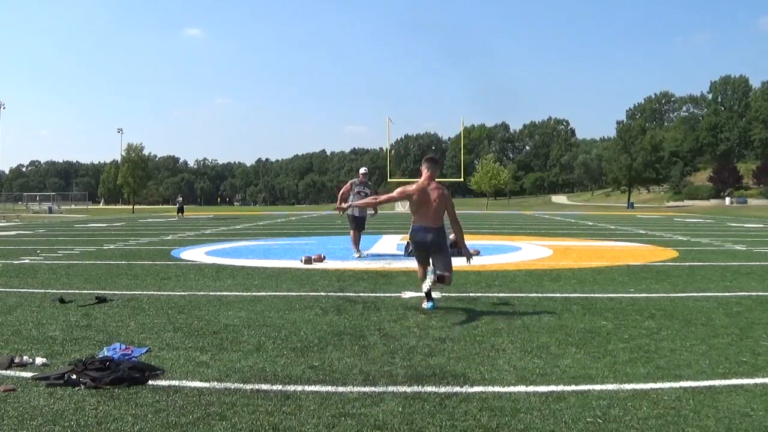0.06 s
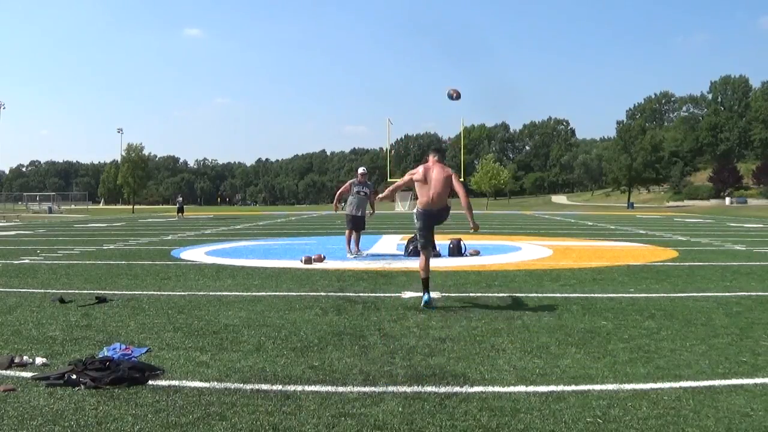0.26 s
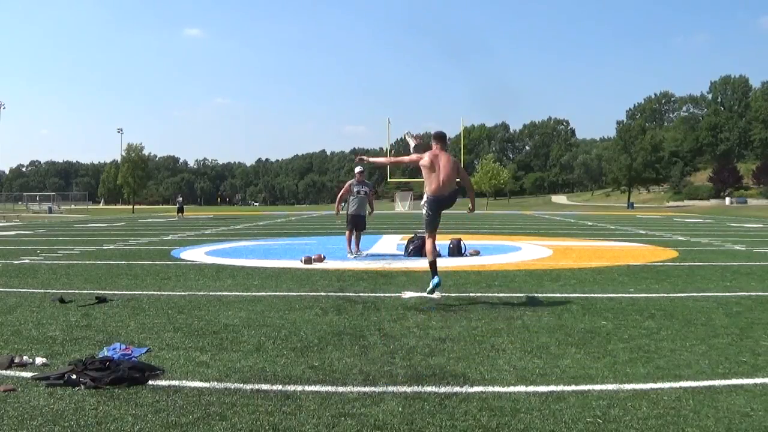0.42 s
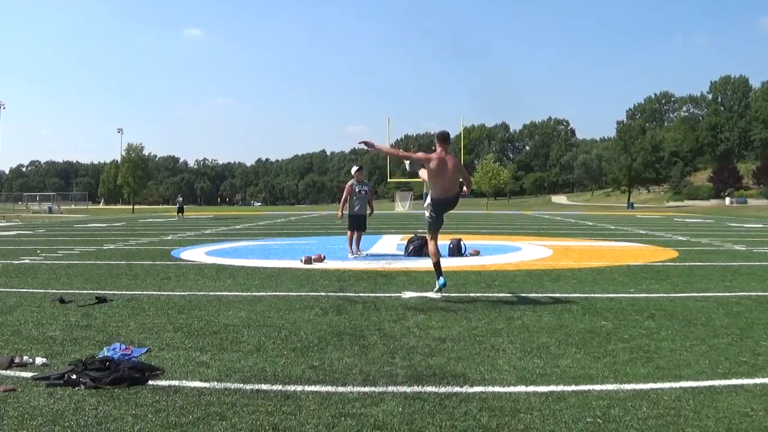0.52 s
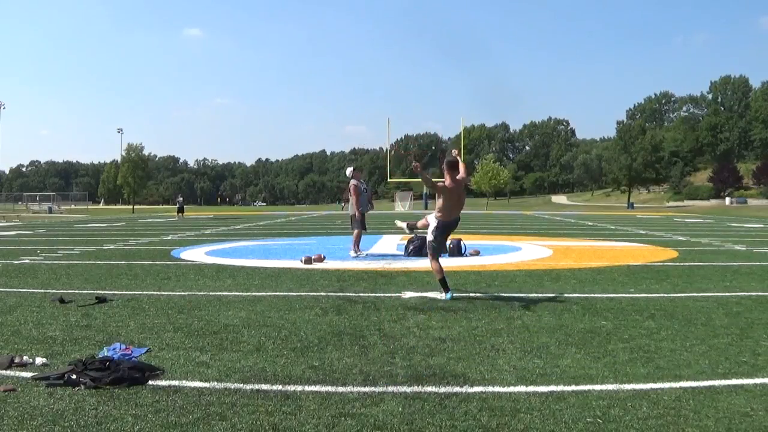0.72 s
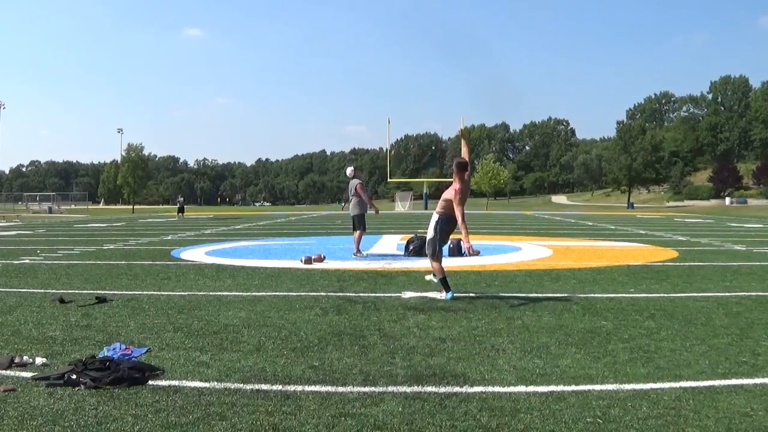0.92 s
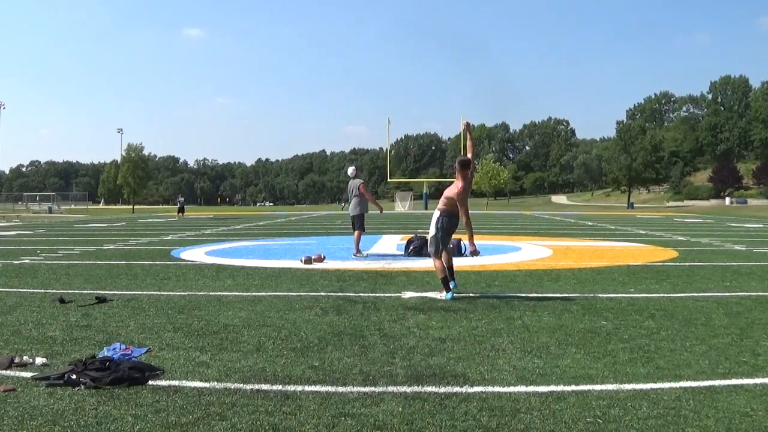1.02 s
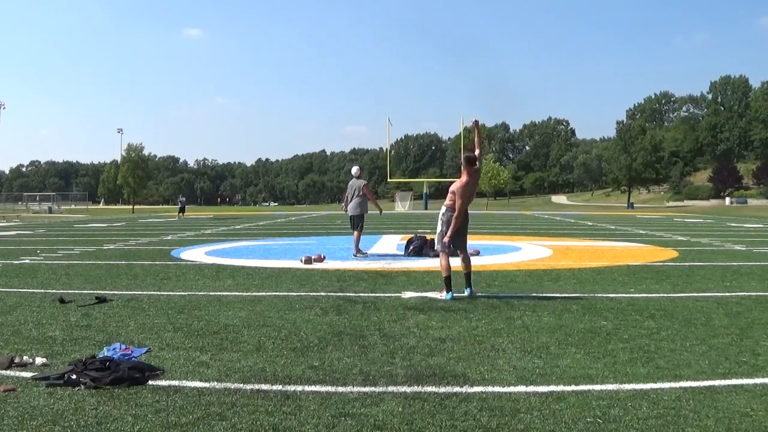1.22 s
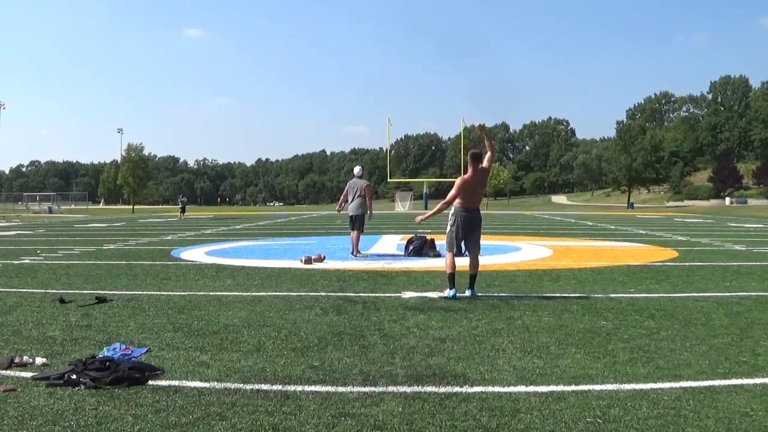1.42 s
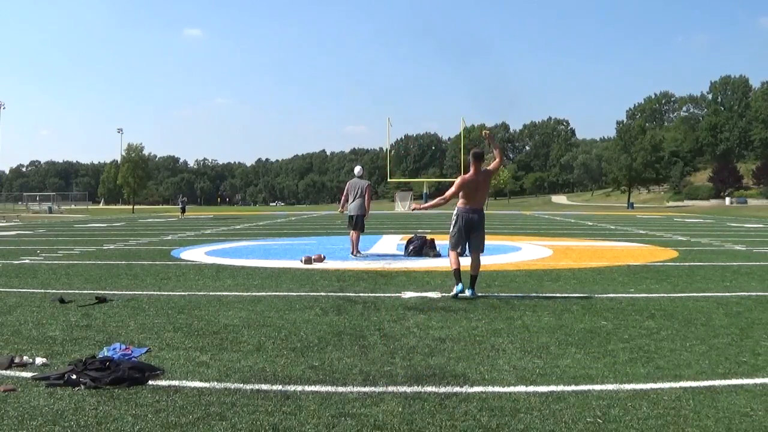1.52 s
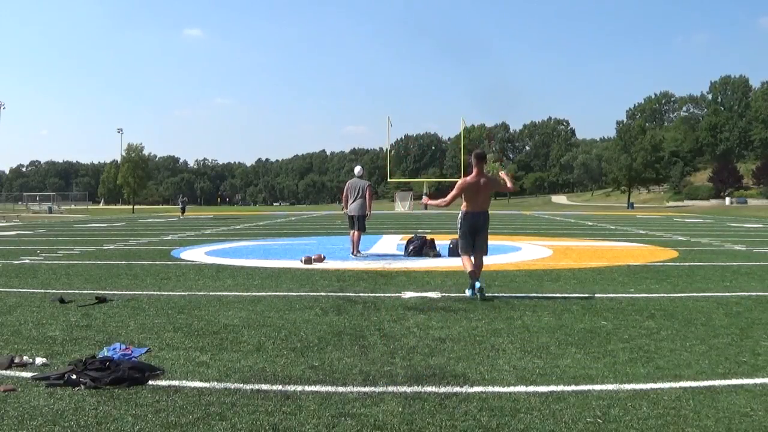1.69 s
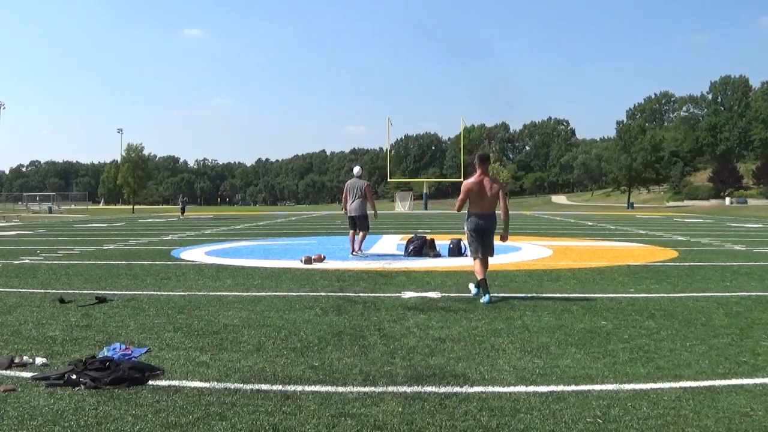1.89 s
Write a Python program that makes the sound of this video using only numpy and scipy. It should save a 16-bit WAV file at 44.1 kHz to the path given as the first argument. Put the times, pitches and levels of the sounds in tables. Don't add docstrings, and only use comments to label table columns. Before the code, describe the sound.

A football punt hits at about 0.24 s: a bright leather crack with a short, hollow low thump, after tiny shoe ticks and scuffs. A weak slap-back follows at 0.28 s and faint echoes until 0.5 s. Low wind flutter buffets the microphone, strongest from 0.6 to 1.0 s, then eases. A soft heel step lands near 1.43 s. Quiet distant traffic continues; a faint high insect buzz runs from 1.04 s.

```python
import sys
import numpy as np
from scipy import signal
from scipy.fft import rfft, irfft
from scipy.io import wavfile
from scipy.ndimage import uniform_filter1d

SR = 44100
rng = np.random.default_rng(int(sys.argv[2]) if len(sys.argv) > 2 else 0)


def how_loud(loudness_db):
    steps = np.asarray(loudness_db, float) / 20
    return 10 ** steps


def wrap_up_sound(samples):
    columns = np.atleast_2d(samples).T
    tamed = np.clip(columns, -1, 1)
    steps = np.round(tamed * 32767).astype(np.int16)
    wavfile.write(sys.argv[1], SR, steps)


N = 85995


def evened(x):
    return x / np.sqrt(np.mean(x ** 2) + 1e-20)


def read(points, hz):
    f, value = np.transpose(points)
    return np.interp(np.log(hz + 1), np.log(f + 1), value)


def add(mix, s, sound):
    part = mix[..., round(s * SR):][..., :sound.shape[-1]]
    part += sound[..., :part.shape[-1]]


def drift(rate_hz, count):
    width = max(int(SR / rate_hz / 2), 1)
    smooth = uniform_filter1d(rng.standard_normal(count), width)
    return evened(uniform_filter1d(smooth, width))


def kick():
    # (time [s], level [dB], centre [Hz], width [octaves], smear [s])
    strike = [
        (.2397, -7, 5000, 1.6, .001),
        (.2488, -25, 1900, .4, .0006),
    ]
    # (time [s], level [dB], low edge [Hz], high edge [Hz], smear [s])
    clicks = [
        (.2774, -20, 1700, 6500, .0008),
        (.2794, -20, 2800, 10500, .001),
        (.1135, -33, 1200, 11000, .0005),
        (.118, -40, 4000, 11000, .0005),
        (.325, -41, 800, 2700, .002),
        (.347, -41, 3800, 6000, .001),
        (.4015, -36, 6500, 11500, .0005),
        (.4065, -43, 8000, 11500, .0005),
        (.4945, -34, 2300, 6300, .002),
    ]
    # (time [s], level [dB], hold [s], pitch [Hz])
    thumps = [
        (.2398, -8.9, .0092, 167),
        (.2813, -25.5, .0045, 165),
    ]
    high, low = np.zeros(N), np.zeros(N)
    for s, *row in strike:
        add(high, s, crack(*row))
    for s, *row in clicks:
        add(high, s, tick(*row))
    for s, *row in thumps:
        add(low, s, thump(*row))
    release_s = 0.2445
    add(low, release_s, ball_air())
    return high * how_loud([[-1.2], [1.2]]) + low + stereo_lean()


def crack(level_db, centre_hz, octaves, smear):
    # (frequency [Hz], level [dB], 60 dB decay time [s])
    leather = [(1780, -1.5, .004), (2250, -4, .0035), (3100, -9, .002), (3800, -2, .003), (4500, 0, .003),
               (5300, -1.5, .003), (6900, -4, .0025), (9000, -2, .0025), (10500, -3, .002)]
    ragged, rise_s = 0.13, 0.00012
    t = np.arange(400) / SR
    drive = ragged * rng.standard_normal(len(t)) * np.exp(-t / smear)
    drive[0] = 1
    ring = np.zeros(len(t))
    for k, (hz, db, t60) in enumerate(leather):
        off_centre_db = 6 * (np.log2(hz / centre_hz) / octaves) ** 2
        sign = (-1) ** (k + 1)
        ring += sign * how_loud(db - off_centre_db - 60 * t / t60) * np.sin(2 * np.pi * hz * t)
    y = np.convolve(drive, ring * (1 - np.exp(-t / rise_s)))
    return how_loud(level_db) * y / abs(y).max()


def tick(level_db, low_hz, high_hz, smear):
    ragged = 0.28
    t = np.arange(400) / SR
    drive = ragged * rng.standard_normal(len(t)) * np.exp(-t / smear)
    drive[0] = 1
    band = signal.butter(4, [low_hz, high_hz], "band", fs=SR, output="sos")
    y = signal.sosfilt(band, drive)
    return how_loud(level_db) * y / abs(y).max()


def thump(level_db, hold, hz):
    rise_s, t60_s, lead_in_s, push_s = 0.004, 0.013, 0.0009, 0.014
    sharp_trough, push_level = 0.16, 0.29
    t = np.arange(1500) / SR
    turn = 2 * np.pi * hz * (t - lead_in_s)
    attack = np.minimum(0.4 + 0.6 * t / rise_s, 1) * np.minimum(t / lead_in_s, 1)
    decay = how_loud(-60 * np.maximum(t - hold, 0) / t60_s)
    push = push_level * np.sin(np.pi * np.minimum(t / push_s, 1))
    cycles = np.cos(turn) + sharp_trough * np.cos(2 * turn)
    return how_loud(level_db) * (push - attack * decay * cycles)


def ball_air():
    # (frequency [Hz], level [dB], 60 dB decay time [s])
    modes = [(285, -15.5, .025), (506, -28.5, 0.052), (724, -26.5, 0.037), (1378, -30, 0.042),
             (1720, -32, 0.029)]
    # (frequency [Hz], level [dB], 60 dB decay time [s])
    sing = (905, -41, .2)
    t = np.arange(9000) / SR
    ring = sum(how_loud(db - 60 * t / t60) * np.sin(2 * np.pi * hz * t) for hz, db, t60 in modes + [sing])
    return np.minimum(t / 0.0017, 1) * ring


def stereo_lean():
    start_s, length_s, level_db, skew = 0.2432, 0.0036, -7.8, 2.3
    u = np.linspace(0, 1, round(length_s * SR))
    lean = np.zeros(N)
    add(lean, start_s, how_loud(level_db) * np.sin(np.pi * u ** skew))
    return lean * [[1], [-1]]


def scuffs():
    # (start [s], length [s], level [dB], centre [Hz], width [octaves])
    brushes = [(0, 0.08, -65, 8200, 0.59), (0.08, 0.051, -57, 4430, 1.3), (0.186, 0.081, -52.5, 7450, 1.7),
               (0.238, 0.034, -47.5, 3700, 0.61), (0.282, 0.032, -56, 3980, 0.63),
               (0.294, 0.36, -61.5, 3970, 0.7), (0.389, 0.064, -60, 5380, 2.2),
               (0.603, 0.17, -60.5, 4000, 0.64), (0.722, 0.027, -61.5, 7000, 1.8),
               (0, 0.18, -51, 264, 0.77), (0.15, 0.053, -66, 45, .5), (1.456, 0.039, -53, 565, 0.14)]
    # (start [s], length [s], level [dB], centre [Hz], width [octaves])
    heel = [
        (1.426, .022, -45, 630, .2),
        (1.45, .025, -55, 2250, .12),
    ]
    grit_db, hiss_top_hz, size = 2.5, 11050, 16384
    f = np.fft.rfftfreq(size, 1 / SR) + 1
    out = np.zeros((2, N))
    for s, length, db, hz, octaves in brushes + heel:
        u = np.linspace(0, 1, round(length * SR))
        shared, left, right, grit = rng.standard_normal((4, size))
        raw = shared + 0.46 * np.array([left, right])
        raw = raw * how_loud(grit_db * evened(uniform_filter1d(grit, size=60)))
        band = np.exp(-0.5 * (np.log2(f / hz) / octaves) ** 2) * (f < hiss_top_hz)
        hiss = evened(irfft(rfft(raw) * band))
        shape = np.clip(np.minimum(u / 0.061, (1 - u) / 0.46), 0, 1)
        add(out, s, how_loud(db) * hiss[:, :len(u)] * shape * how_loud([[-1], [1]]))
    return out


def wind():
    # (time [s], level [dB])
    strength = [(0.0, -46.5), (0.13, -44), (0.298, -43.5), (0.738, -35), (0.83, -38), (1.336, -41),
                (1.564, -40), (1.716, -44), (1.95, -47)]
    # (frequency [Hz], density [dB per Hz])
    rumble = [(12, -26), (20, -7.5), (91, 1), (138, -3.5), (358, -26.5), (497, -38), (560, -18.5),
              (621, -35), (700, -65), (910, -71), (1540, -120)]
    # (centre [s], level [dB], half-length [s], flutter [Hz])
    buffets = [(.52, -34, .06, 98.6), (0.582, -29, .06, 96.4), (.395, -41.5, .03, 170.6),
               (0.633, -27, 0.034, 106), (.657, -19.5, .022, 114.5), (.68, -22, .018, 113.2),
               (0.741, -35, .05, 103.7), (.842, -22, .035, 108.4), (0.876, -26, .04, 125.4),
               (0.904, -24.5, .035, 116.4), (0.926, -22.5, .03, 135.7), (.982, -28, .035, 141.6),
               (1.039, -31.5, .06, 94.8), (1.163, -29, .03, 155.2), (1.216, -31.5, .04, 105),
               (1.262, -38, .04, 98), (1.381, -29.5, .045, 95.6), (1.459, -36.5, .04, 108),
               (1.538, -27, .028, 118.7), (1.595, -35.5, .045, 96.9), (1.689, -40.5, .04, 95.2),
               (1.912, -43, .04, 113.7)]
    wobble, snap_level, shove, left_lag_s = 0.15, 0.26, 0.32, 0.00099
    s, db = np.transpose(strength)
    likeness = [(30, 0.75), (150, 1.0), (400, 0.17)]  # (frequency [Hz], left-right likeness)
    out = air(rumble, likeness, patchy_db=-1.5) * how_loud(np.interp(np.arange(N) / SR, s, db))
    for mid, db, length, hz in buffets:
        u = np.linspace(-1, 1, round(2 * length * SR))
        pitch = hz * (1 + wobble * drift(74.6, count=6000)[:len(u)])
        turn = 2 * np.pi * (np.cumsum(pitch) / SR + rng.random())
        snap = np.clip(snap_level * how_loud((db + 24) * 0.4), 0, 0.5)
        flutter = sum(snap ** k * np.sin((k + 1) * turn) for k in range(5))
        flutter = flutter + shove * np.sin(turn * 0.477)
        y = flutter * how_loud(db + 1.5) * np.exp(-6 * u ** 2)
        add(out[1], mid - length, y)
        add(out[0], mid - length + left_lag_s * how_loud((db + 30) * 0.5), y)
    return out


def insect():
    # (start [s], length [s], level [dB], pitch [Hz], bandwidth [Hz])
    calls = [
        (.24, 0.358, -65.5, 5900, 140),
        (1.041, 1.2, -59.5, 5764, 198),
    ]
    rise_s, pulses_per_s, throb_db = 0.13, 110, 1.2
    out = np.zeros(N)
    for s, length, db, hz, width in calls:
        t = np.arange(round(length * SR)) / SR
        rate = pulses_per_s * (1 + 0.21 * drift(60, count=N)[:len(t)])
        turns = np.cumsum(rate) / SR
        drive = rng.standard_normal(N)[:len(t)] * (0.99 + np.exp(-(turns % 1) / 0.75))
        band = signal.butter(2, [hz - width / 2, hz + width / 2], "band", fs=SR, output="sos")
        fade = np.clip(np.minimum(t, length - t) / rise_s, 0, 1)
        shape = fade * how_loud(throb_db * drift(15, count=N)[:len(t)])
        add(out, s, how_loud(db) * shape * evened(signal.sosfilt(band, drive)))
    return out * how_loud([[-1], [1]])


def traffic_wash():
    # (frequency [Hz], density [dB per Hz])
    spectrum = [(150, -18), (250, -2), (438, -2), (482, -5.5), (991, 1.5), (1740, -8.5), (9800, -26),
                (11000, -28.5), (11500, -75), (15000, -78), (22000, -120)]
    # (frequency [Hz], left-right likeness)
    likeness = [(200, 1), (500, 0.39), (1200, 0.51), (3000, 0.2), (6000, 0.25), (11000, 0.96)]
    return how_loud(-49) * air([(20, -3), (120, -28)] + spectrum, likeness, patchy_db=1.03)


def air(spectrum, same, patchy_db):
    # (frequency [Hz], left minus right [dB])
    balance = [(60, 1), (170, -2), (490, 2), (1400, -4.5), (3990, 0), (11400, 0.0)]
    frames, hz = N // 256 + 5, np.fft.rfftfreq(1024, 1 / SR)
    a, b, c, d, p = rng.standard_normal((frames, 513, 5)).T
    p = uniform_filter1d(p, size=10, axis=0)
    p = evened(uniform_filter1d(p, size=10, axis=1))
    like = np.clip(read(same, hz), -1, 1)[:, None]
    tilt = read(balance, hz)[:, None] / 2
    left = a + 1j * b
    right = like * left + np.sqrt(1 - like ** 2) * (c + 1j * d)
    z = np.array([left * how_loud(tilt), right * how_loud(-tilt)])
    z = z * how_loud(read(spectrum, hz)[:, None] + patchy_db * p)
    return evened(signal.istft(z, nperseg=1024, noverlap=768)[1][:, :N])


def scene():
    return kick() + scuffs() + wind() + insect() + traffic_wash()


def top_cut(x):
    return signal.sosfilt(signal.butter(12, 12010, fs=SR, output="sos"), x)


def record(dry):
    edge = signal.firwin(127, 11280, window=("kaiser", 5), fs=SR)
    mix = signal.oaconvolve(dry, edge[None], "same")
    return top_cut(mix)


dry = scene()
out = record(dry)
wrap_up_sound(out)
```